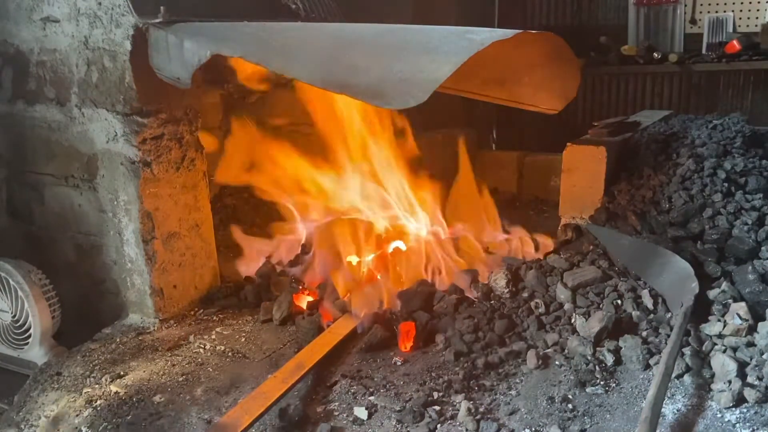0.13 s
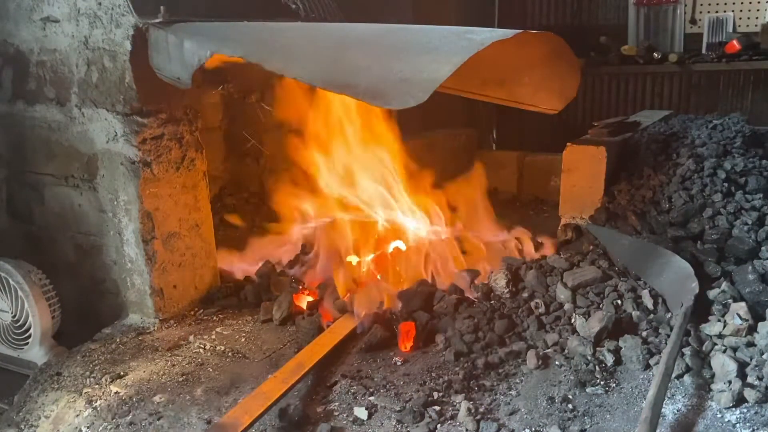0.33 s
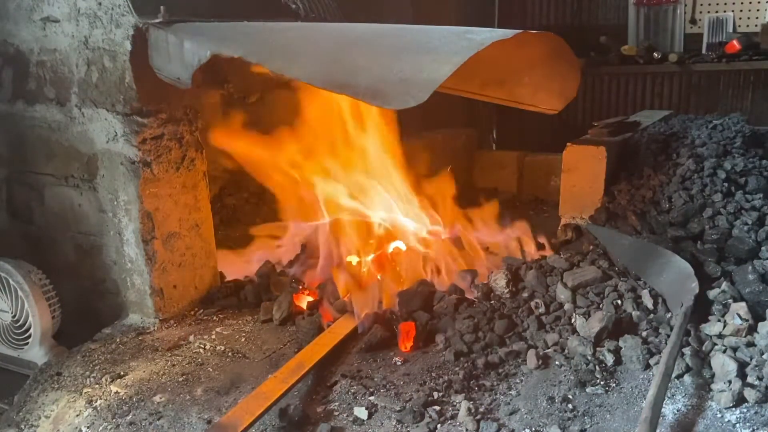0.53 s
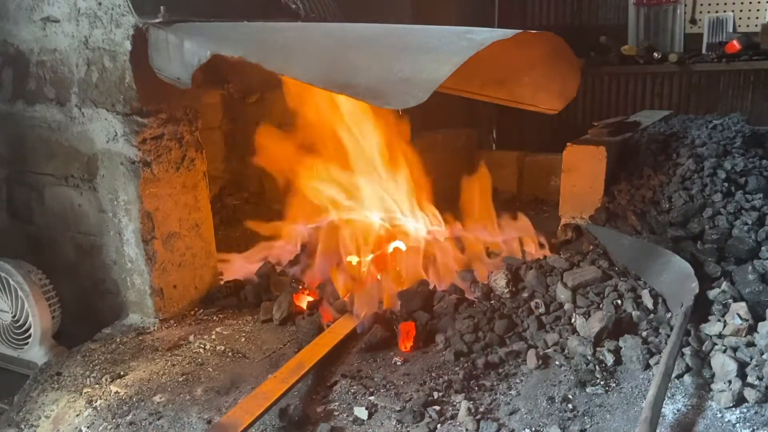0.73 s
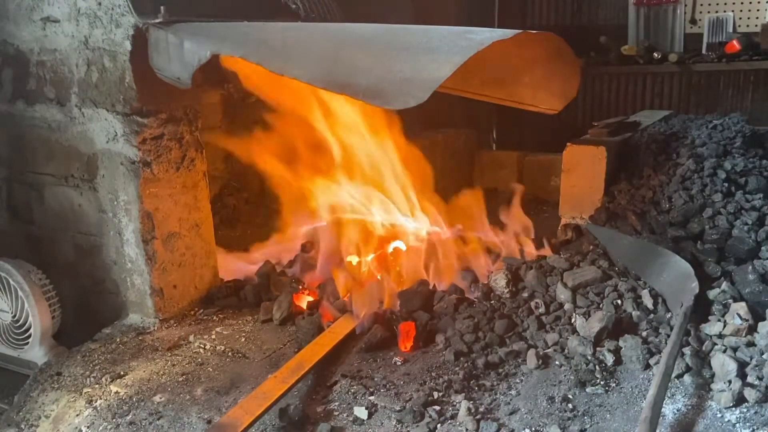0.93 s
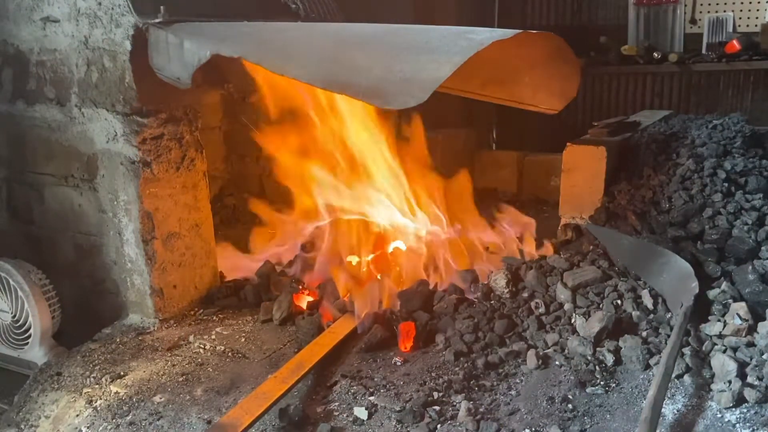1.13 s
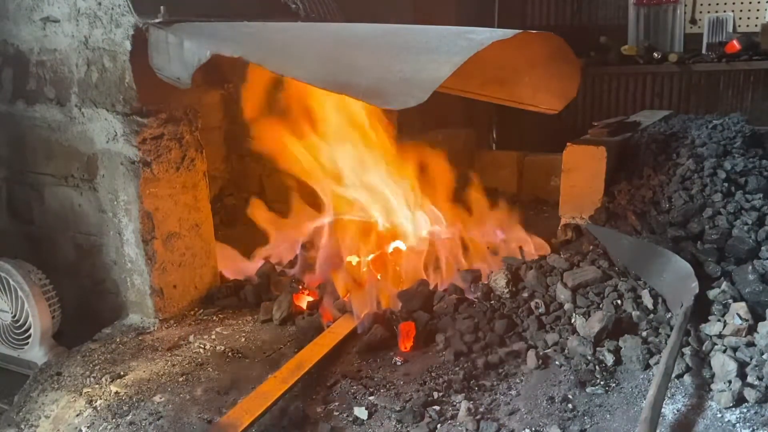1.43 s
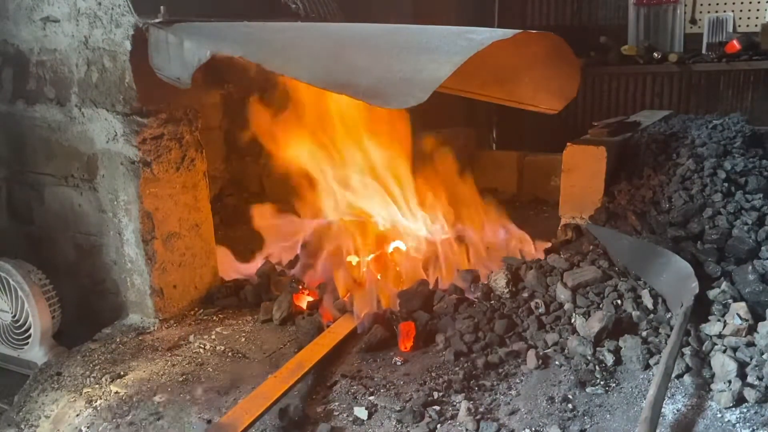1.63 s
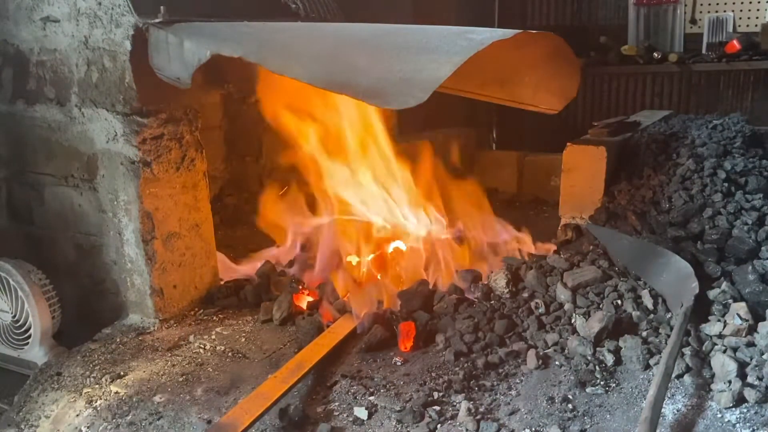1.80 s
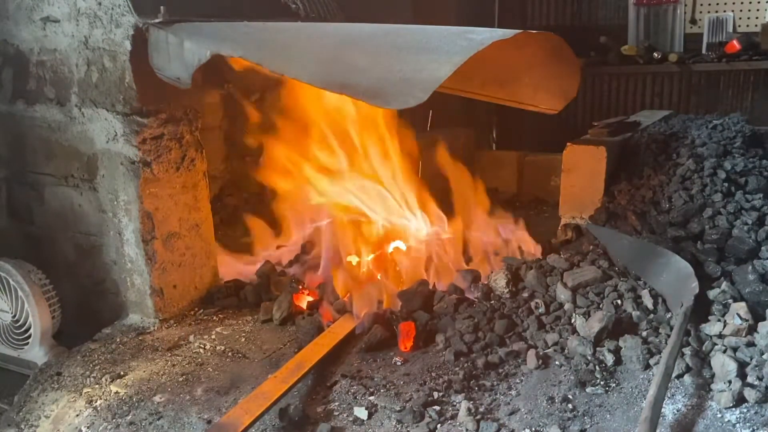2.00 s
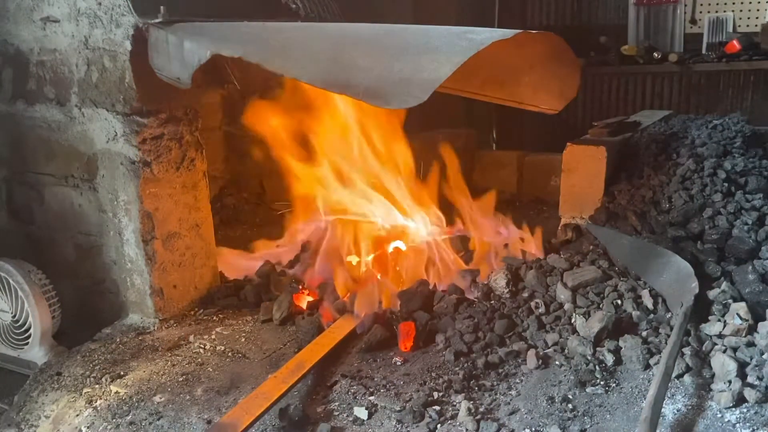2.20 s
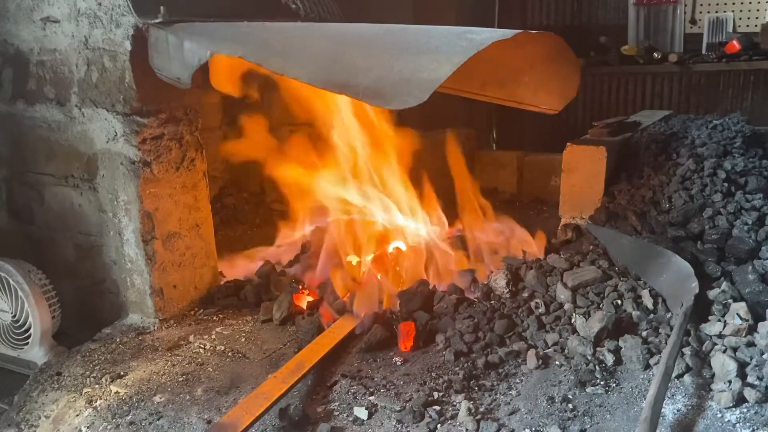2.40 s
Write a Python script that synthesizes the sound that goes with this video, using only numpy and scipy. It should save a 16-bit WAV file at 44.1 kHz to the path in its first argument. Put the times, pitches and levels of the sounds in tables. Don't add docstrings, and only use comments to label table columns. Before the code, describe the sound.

Forge blower humming steadily under rushing air and rumbling flames, coals ticking, one sharp snap midway

```python
import sys
import numpy as np
from scipy import signal
from scipy.fft import rfft, irfft, next_fast_len
from scipy.io import wavfile
from scipy.ndimage import uniform_filter1d

SR = 44100
rng = np.random.default_rng(int(sys.argv[2]) if len(sys.argv) > 2 else 0)


def master_out(mix):
    frames = np.transpose(np.atleast_2d(mix))
    ceiling = np.clip(frames, -1, 1)
    pcm = np.round(ceiling * 32767).astype(np.int16)
    wavfile.write(sys.argv[1], SR, pcm)


def linear_from_db(decibels):
    return 10 ** (np.asarray(decibels, float) / 20)


N = 112454

# (time [s], blade rate [Hz])
BLADE_RATE = [(0, 192.8), (.16, 194.1), (.26, 193.2), (.36, 190), (.46, 188.1), (.56, 187.3), (.76, 187.3),
              (1.06, 184.1), (1.2, 186), (1.36, 189.8), (1.45, 192.9), (1.65, 194.3), (1.85, 189.7),
              (1.96, 188.3), (2.15, 187), (2.26, 186.3), (2.36, 183.9), (2.55, 181.8)]
# (time [s], level [dB])
HUM_LEVEL = [(0, -28), (0.201, -27), (.4, -26), (0.551, -23.5), (.82, -23.5), (1.05, -27), (1.18, -26.5),
             (1.3, -22), (1.46, -29), (1.621, -27), (1.899, -26), (2.101, -23.5), (2.25, -24), (2.399, -28),
             (2.5, -31.5), (2.55, -28)]
# (multiple of blade rate, level [dB], left leads [rad], throb per shaft turn [0-1])
GEAR_TONES = [(2, -44.5, 1, 0.71), (4, -47.5, 2, 0), (6, -53, 3, 0.6), (8, -50, -1.1, 0),
              (10, -57, 0.82, 0.3), (12, -56, 0.1, 0.3), (14, -51.5, 3, 0.4), (16, -55, 2.5, 0.6),
              (18, -62, 2, .3), (20, -66, 4, 0.7), (21, -72, -0.5, 0), (22, -75, 2, 0.6),
              (24, -72.5, 2.5, 0.5)]
# (multiple, time in the first turn [s], length [s], rise [dB])
GEAR_SWELLS = [(2, 0.85, 0.24, 2), (8, 0.11, 0.075, 6.5), (8, 0.505, 0.047, 9), (10, .46, .07, 11),
               (10, .72, .25, 12), (10, .98, .09, 8.5), (12, .27, .2, 9.5), (12, 1.12, .07, 8),
               (12, 1.38, .07, 6), (6, 1.3, 0.22, 4), (14, 0.24, 0.087, 7), (16, 0.32, 0.15, 5),
               (18, 1.2, .12, 13), (20, 0.31, 0.16, 18.5), (21, 0.44, .07, 16), (22, 0.78, .07, 18),
               (22, 0.2, 0.064, 24), (24, 0.5, .08, 22)]
BLADES, CRANK_TURN_S = 6, 1.5
HUM_EVEN_HZ, HUM_PAN_DB_PER_HZ = 186.7, -0.72
HUM_LEAD_RAD, HUM_LEAD_RAD_PER_HZ = 0.16, 0.048
HUM_WAVER_DB, HUM_THROB, GEAR_WAVER_DB = -0.37, 0.051, 1.2

# (time [s], level [dB])
AIR_FLOW = [(0, -5), (.3, 4), (.43, 0), (.6, -6), (.85, 1), (1.1, -5.5), (1.45, -3), (1.75, 2), (1.9, 0),
            (2.1, -6), (2.32, 2), (2.55, -5.5)]
# (frequency [Hz], share [0-1])
FLOW_SHARE = [(200, 0.17), (1200, 0.048), (3500, 0.87), (7000, 0.18), (15000, 0.054)]
# (frequency [Hz], density [dB/Hz])
RUSH_SPECTRUM = [(25, -44), (85, -6), (150, -6.5), (300, -6.5), (1000, -10), (3000, -17), (4500, -28.5),
                 (12000, -52)]
# (frequency [Hz], density [dB/Hz])
FIZZ_SPECTRUM = [(2000, -50), (4500, -4), (6500, 0.5), (8500, -0.5), (10500, -4.5), (14500, -7.5),
                 (15100, -2), (15500, -35)]
# (frequency [Hz], width [Hz], gain
# [dB])
AIR_COLOUR_BANDS = [(930, 30, -3), (926, 24, 1.5), (1162, 18, -0.5), (1300, 110, 1.5), (1607, 60, 4.5),
                    (2190, 380, 1), (2790, 68, 3.5), (3166, 50, 3.5), (3960, 105, 1), (6680, 110, 1.5),
                    (187, 43, -3.5), (506, 49, -4), (634, 44, -3.5), (778, 49, -10.5), (1037, 64, -5.5),
                (1352, 60, -2.5), (1670, 50, -6), (2024, 49, -5.5), (2170, 50, -2.5), (2540, 84, -5),
                (2910, 150, -5.5), (3230, 86, -4), (3595, 400, -4), (4910, 310, -2.5)]
RUSH_DB, FIZZ_DB, AIR_TOP_HZ = -32.5, -53, 15350

# (frequency [Hz], width [Hz], level [dB])
HEARTH_MODES = [(64.3, 15.5, -44), (119, 22, -57), (214, 11.3, -45), (277.5, 16.5, -44.5), (325.6, 23, -46),
                (454.2, 21.4, -45.5), (587, 64, -43.5), (694, 36, -50), (908.5, 86, -42)]
# (time [s], length [s], rise [dB])
FLAME_SURGES = [
    (0.078, 0.058, 2),
    (0.328, 0.023, 5),
    (0.828, 0.085, 6),
    (1.43, 0.028, 6.5),
    (2.268, 0.034, 5.5),
    (2.386, 0.064, 7),
]
# (time [s], frequency [Hz], length [s], level [dB])
HEARTH_BOOMS = [
    (.08, 284, 0.071, -39.5),
    (0.329, 286, 0.028, -39),
    (.83, 282.6, .06, -32),
    (0.852, 216.6, .045, -35),
    (0.871, 65, 0.067, -35),
    (2.26, 214, .04, -33),
    (2.269, 280, .04, -35.5),
    (2.37, 62, .07, -36),
    (2.366, 324, 0.065, -35),
]
SURGE_TOP_HZ = 440

# (time [s], peak level [dB], tilt [dB/octave], spread [ms])
COAL_CRACKS = [
    (.5674, -29.5, 1, .5),
    (.5712, -32, 0, .8),
    (.7617, -23.5, 7, .06),
    (1.126, -31.5, 12, .1),
    (1.1637, -33.5, 8, .15),
    (1.1954, -40, 10, .1),
    (1.3845, -40, 10, .3),
    (1.8753, -35, 3, .6),
    (1.9147, -38, 0, .2),
    (2.2595, -39, 10, .1),
]
# (peak level [dB], tilt [dB/octave], spread [ms])
LOUD_SNAP = (-5, 1.5, 0.021)
# (delay [ms], level [dB])
NEAR_ECHOES = [
    (1.55, -10),
    (3.2, -13),
    (4.2, -19),
    (7.3, -27),
    (9.6, -25),
]
SNAP_S = 1.432
CRACK_LOW_HZ, CRACK_TOP_HZ, CRACK_BODY_DB = 6400, 13500, -8
TICKS_PER_S, TICK_DB, TICK_SPREAD_DB = 25, -64, 3
RIGHT_ECHO_MS, RIGHT_ECHO_DB, ECHO_SMEAR_MS = 0.32, -7, 0.2
TAIL_DB, TAIL_T60_S, TAIL_SAME, TAIL_TOP_HZ = -33, 0.2, 0.9, 14800

# (frequency [Hz], likeness [0-1])
PORT_LIKENESS = [(60, .995), (130, .99), (300, .88), (550, .8), (1650, .72), (3000, .68), (5000, .5),
                 (9500, .95)]
# (frequency [Hz], likeness [0-1])
FIZZ_LIKENESS = [(6500, .45), (8200, .68), (9600, .98), (15000, .985)]
# (frequency [Hz], difference [dB])
PORT_BALANCE = [(60, 0.5), (180, -7), (550, 0), (1650, -0.5), (4970, 4.5), (8300, -1.5), (12000, 0),
                (15000, 1)]
# (frequency [Hz], left leads [rad])
PORT_PHASE = [(100, .03), (1890, -.4), (2840, .9), (4050, .5), (6400, .1)]
PORT_FROM_HZ, PORT_TURN_HZ = 6400, 3700
MIC_LOW_HZ, MIC_TOP_HZ = 48, 16000


def blower():
    t = np.arange(N) / SR
    hz = uniform_filter1d(np.interp(t, *np.transpose(BLADE_RATE)), size=2000, mode="nearest")
    blade_phase = 2 * np.pi * np.cumsum(hz) / SR
    shaft_phase = blade_phase / BLADES
    side = np.array([[0.5], [-0.5]])
    off_hz = hz - HUM_EVEN_HZ

    hum_db = uniform_filter1d(np.interp(t, *np.transpose(HUM_LEVEL)), size=2000, mode="nearest")
    hum_db = hum_db + HUM_WAVER_DB * drift(top_hz=26.2)
    hum_gain = np.sqrt(2) * linear_from_db(hum_db + side * HUM_PAN_DB_PER_HZ * off_hz)
    hum_lead = side * (HUM_LEAD_RAD + HUM_LEAD_RAD_PER_HZ * off_hz)
    out = hum_gain * (1 + HUM_THROB * np.sin(shaft_phase)) * np.sin(blade_phase + hum_lead)

    for multiple, db, lead, throb in GEAR_TONES:
        level = db + GEAR_WAVER_DB * drift(top_hz=39.76, low_hz=9)
        for swelling, s, length, rise_db in GEAR_SWELLS:
            if round(swelling) == round(multiple):
                from_swell = (t - s + CRANK_TURN_S / 2) % CRANK_TURN_S - CRANK_TURN_S / 2
                level = level + rise_db * bump(from_swell, length)
        beat = 1 + throb * np.sin(shaft_phase + 2 * np.pi * rng.random())
        tone_phase = round(multiple) * blade_phase + side * lead + 2 * np.pi * rng.random()
        out += np.sqrt(2) * linear_from_db(level) * beat * np.sin(tone_phase)
    return out


def air():
    def blown(spectrum):
        def shape_db(hz, t):
            colour = sum(db / (1 + (2 * (hz - f) / width) ** 2) for f, width, db in AIR_COLOUR_BANDS)
            flow = read(FLOW_SHARE, hz) * np.interp(t, *np.transpose(AIR_FLOW))
            return read(spectrum, hz) + colour + flow
        return shape_db

    rush = noise(blown(RUSH_SPECTRUM), PORT_LIKENESS, patchy_db=1.22)
    fizz = noise(blown(FIZZ_SPECTRUM), FIZZ_LIKENESS, patchy_db=3.5)
    top = signal.butter(12, AIR_TOP_HZ, fs=SR, output="sos")
    return signal.sosfilt(top, linear_from_db(RUSH_DB) * rush + linear_from_db(FIZZ_DB) * fizz)


def flames():
    t = np.arange(N) / SR
    side = np.array([[0.5], [-0.5]])
    surge_db = sum(db * bump(t - s, length) for s, length, db in FLAME_SURGES)
    out = np.zeros((2, N))
    for hz, width, db in HEARTH_MODES:
        a, b = rng.standard_normal((2, N))
        same = np.clip(read(PORT_LIKENESS, hz), 0, 1)
        ports = [a, same * a + np.sqrt(1 - same ** 2) * b]
        r = np.exp(-np.pi * width / SR)
        turn = 2 * np.cos(2 * np.pi * hz / SR)
        ring = signal.lfilter([1, 0, -1], [1, -r * turn, r * r], ports)
        ring = signal.lfilter([1], [1, -r * r * turn, r ** 4], ring)
        lift_db = surge_db / (1 + (hz / SURGE_TOP_HZ) ** 4)
        out += evened(ring) * linear_from_db(db + lift_db + side * read(PORT_BALANCE, hz))
    for s, hz, length, db in HEARTH_BOOMS:
        boom = bump(t - s, length) * np.sin(2 * np.pi * hz * (t - s))
        out += np.sqrt(2) * boom * linear_from_db(db + side * read(PORT_BALANCE, hz))
    return out


def cracks():
    dry = np.zeros(N + 2048)
    hz = np.fft.rfftfreq(1024, 1 / SR)
    t = np.arange(1024) / SR
    for s, db, tilt_db, ms in [*COAL_CRACKS, (SNAP_S, *LOUD_SNAP)]:
        burst = rng.standard_normal(1024) + 3 * (t == t[353])
        burst = burst * bump((t - 0.008) * 1000, ms)
        bright = 1 / np.sqrt(1 + (CRACK_LOW_HZ / (hz + 1)) ** 6) + linear_from_db(CRACK_BODY_DB)
        colour = linear_from_db(tilt_db * np.log2(hz / 8000 + 0.01)) * bright / np.sqrt(1 + (hz / CRACK_TOP_HZ) ** 8)
        burst = irfft(rfft(burst) * colour)
        at = round((s - 0.008) * SR)
        dry[at:at + 1024] += linear_from_db(db) * burst / abs(burst).max()

    tick_level = linear_from_db(TICK_DB + TICK_SPREAD_DB * np.minimum(rng.exponential(1, N), 4))
    ticks = tick_level * (rng.random(N) < TICKS_PER_S / SR)
    dry = dry[:N] + signal.lfilter([1, -2, 1], 1, ticks)

    size = next_fast_len(N)
    wet = rfft(signal.fftconvolve(dry[None], workshop(), axes=1)[:, :N], size)
    wet[0] *= np.exp(1j * port_lead(np.fft.rfftfreq(size, 1 / SR)))
    return irfft(wet, size)[:, :N]


def workshop():
    t = np.arange(SR // 2) / SR
    room = rng.standard_normal((2, SR // 2)) * linear_from_db(-60 * t / TAIL_T60_S)
    room[1] = TAIL_SAME * room[0] + np.sqrt(1 - TAIL_SAME ** 2) * room[1]
    room = signal.sosfilt(signal.butter(10, TAIL_TOP_HZ, fs=SR, output="sos"), room)
    room *= linear_from_db(TAIL_DB) / np.linalg.norm(room[0]) * 10
    room[:, 0] = 1
    for ms, db in NEAR_ECHOES:
        scatter = rng.standard_normal(40) * np.exp(-t[:40] * 1000 / ECHO_SMEAR_MS)
        at = round(ms * SR / 1000)
        room[:, at:at + 40] += linear_from_db(db) * scatter / np.linalg.norm(scatter)
    room[1, round(RIGHT_ECHO_MS * SR / 1000)] -= linear_from_db(RIGHT_ECHO_DB)
    return room


def noise(shape_db, likeness, patchy_db):
    frames = N // 256 + 5
    hz = np.fft.rfftfreq(1024, 1 / SR)[:, None]
    a, b, c, d, patch = rng.standard_normal((frames, 513, 5)).T
    patch = evened(uniform_filter1d(uniform_filter1d(patch, 10, 0), 12, 1))
    same = np.clip(read(likeness, hz), 0, 1)
    left = a + 1j * b
    right = same * left + np.sqrt(1 - same ** 2) * (c + 1j * d)
    z = np.array([left * np.exp(1j * port_lead(hz)), right])
    z *= linear_from_db(shape_db(hz, np.arange(frames) * 256 / SR) + patchy_db * patch)
    z *= linear_from_db(np.array([0.5, -0.5])[:, None, None] * read(PORT_BALANCE, hz))
    return evened(signal.istft(z, nperseg=1024, noverlap=768)[1][:, :N])


def port_lead(hz):
    return read(PORT_PHASE, hz) - 2 * np.pi * np.maximum(hz - PORT_FROM_HZ, 0) / PORT_TURN_HZ


def drift(top_hz, low_hz=0.57):
    t = np.arange(0, N, 64) / SR
    f = np.geomspace(low_hz, top_hz, 20)[:, None]
    waves = np.sin(2 * np.pi * (f * t + rng.random(f.shape))) / np.sqrt(f)
    return np.interp(np.arange(N) / SR, t, evened(waves.sum(0)))


def bump(offset, length):
    return np.exp(-0.5 * (offset / length) ** 2)


def evened(x):
    return x / np.sqrt(np.mean(x ** 2) + 1e-20)


def read(points, hz):
    f, value = np.transpose(points)
    return np.interp(np.log(hz + 1), np.log(f + 1), value)


def scene():
    return blower() + air() + flames() + cracks()


def band_limit(x):
    return signal.sosfilt(signal.butter(12, 16480, fs=SR, output="sos"), x)


def record(dry):
    low = signal.butter(3, MIC_LOW_HZ, "high", fs=SR, output="sos")
    top = signal.butter(12, MIC_TOP_HZ, fs=SR, output="sos")
    mix = signal.sosfiltfilt(top, signal.sosfilt(low, dry))
    return band_limit(mix)


dry = scene()
out = record(dry)
master_out(out)
```